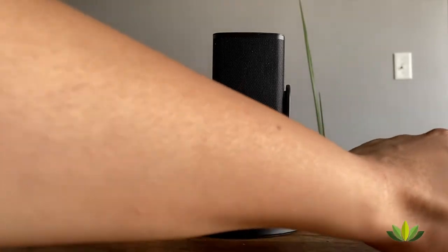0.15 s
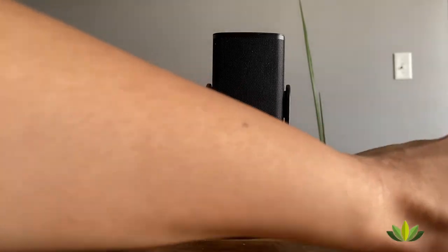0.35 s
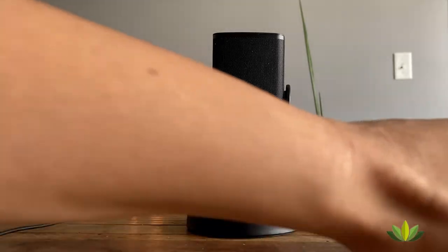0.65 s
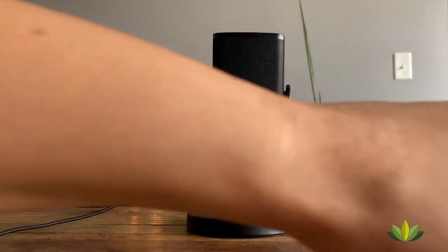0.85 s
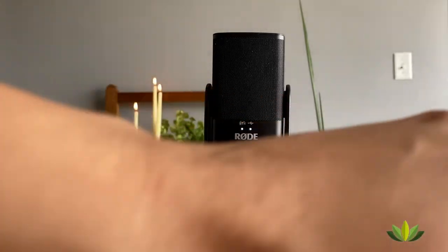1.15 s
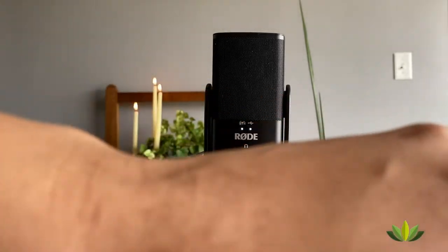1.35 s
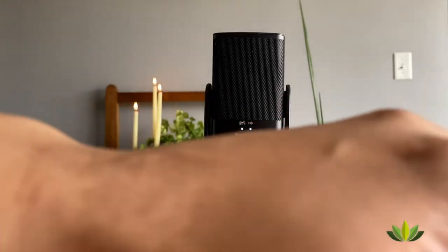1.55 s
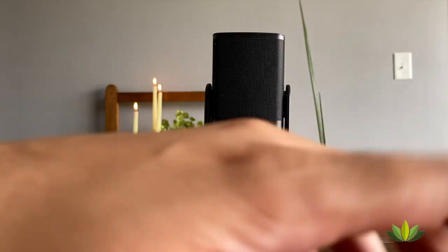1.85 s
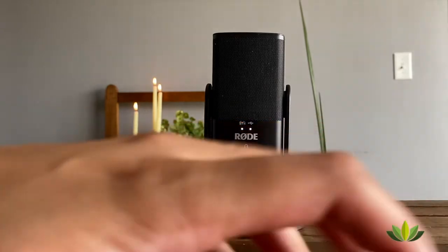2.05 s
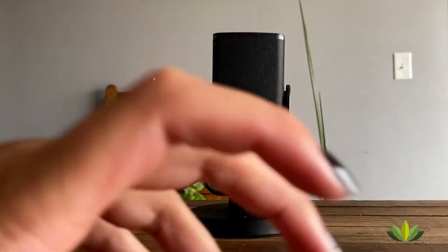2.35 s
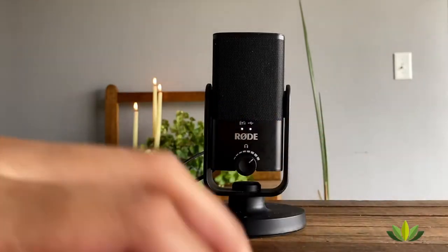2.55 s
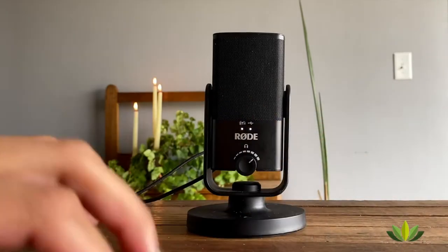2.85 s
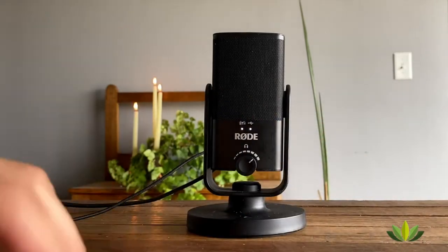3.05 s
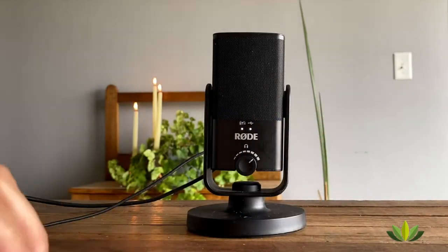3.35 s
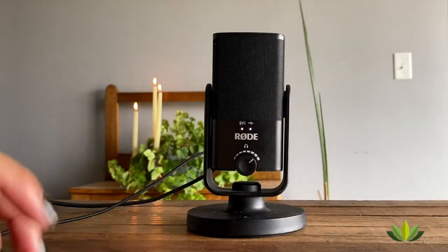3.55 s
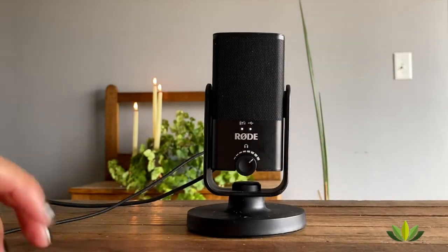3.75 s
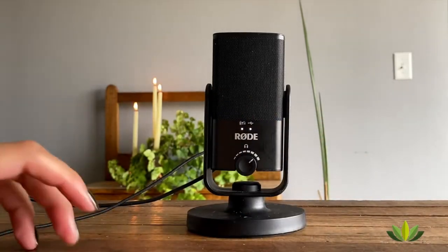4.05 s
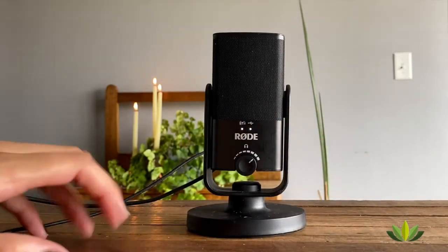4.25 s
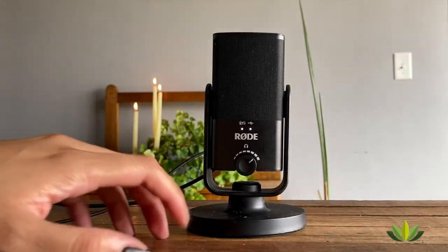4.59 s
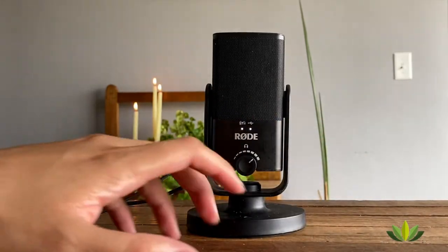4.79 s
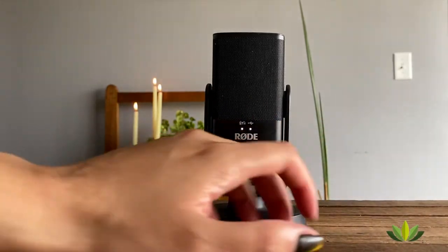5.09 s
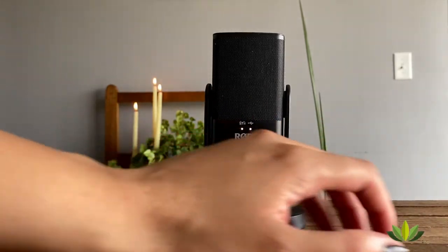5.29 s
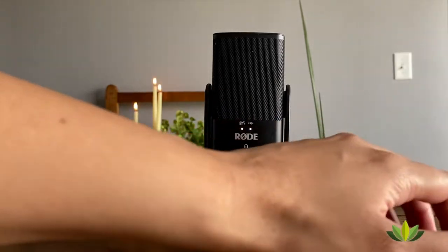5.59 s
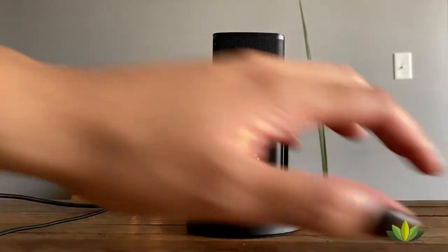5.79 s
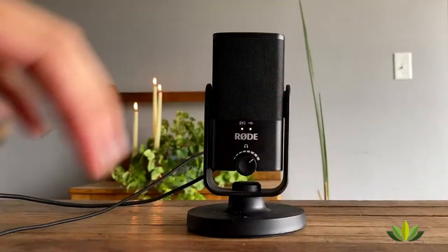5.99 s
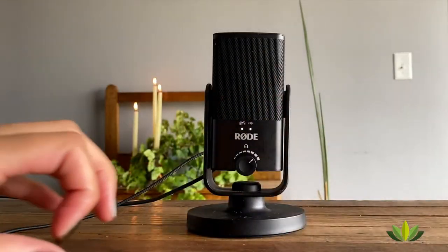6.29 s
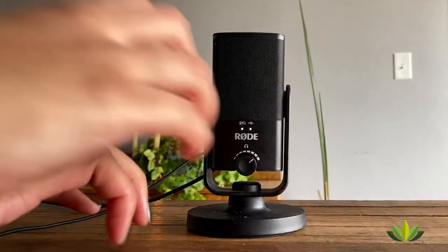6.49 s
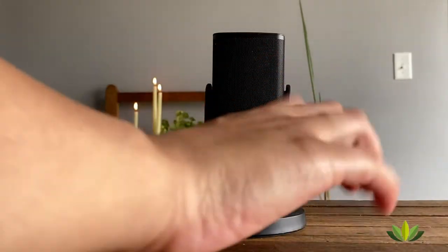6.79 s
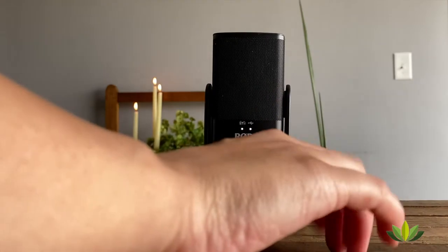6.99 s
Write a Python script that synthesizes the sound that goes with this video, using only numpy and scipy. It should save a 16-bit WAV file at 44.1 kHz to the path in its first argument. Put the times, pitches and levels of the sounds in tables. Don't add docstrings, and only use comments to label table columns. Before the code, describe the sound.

Close-up finger drumming on a hard wooden table, already under way at the start. Light and strong taps alternate unevenly, nails clicking, the board booming softly and the microphone stand shaking with low bumps. Skin drags faintly between hits. A near-silent pause holds dull rubbing and a light cloth swish, broken by one isolated nail tap, before the brisk tapping resumes with a short room echo.

```python
import sys
import numpy as np
from scipy import signal
from scipy.fft import rfft, irfft, next_fast_len
from scipy.io import wavfile
from scipy.ndimage import uniform_filter1d

SR = 44100
rng = np.random.default_rng(int(sys.argv[2]) if len(sys.argv) > 2 else 0)


def store_wav(level_fs):
    pcm = np.round(np.clip(np.atleast_2d(level_fs), -1, 1) * 32767)
    wavfile.write(sys.argv[1], SR, pcm.T.astype(np.int16))


def undo_db(level):
    steps = np.asarray(level, float) / 20
    return 10 ** steps


N = 314433


def unit(x):
    return x / np.sqrt(np.mean(x ** 2) + 1e-20)


def along(points, hz):
    f, v = np.transpose(points)
    return np.interp(np.log(hz + 1), np.log(f + 1), v)


def filtered(x, response):
    m = next_fast_len(N + 8192)
    return irfft(rfft(x, m) * response(np.fft.rfftfreq(m, 1 / SR)), m)[..., :N]


def hiss(spectrum):
    return unit(filtered(rng.standard_normal(N), lambda hz: undo_db(along(spectrum, hz)) * (hz > 20)))


def strokes(rows, round_off=0.59):
    t = np.arange(N) / SR
    gain = np.zeros(N)
    for start_s, length_s, level_db in rows:
        arch = np.abs(np.sin(np.pi * np.clip((t - start_s) / length_s, 0, 1))) ** round_off
        gain += undo_db(level_db) * arch * (t > start_s) * (t < start_s + length_s)
    return gain


def ring(modes, t, scatter_db, detune, lag=0):
    hz, db, t60 = np.transpose(modes)[:, :, None]
    strength, pitch, phase = rng.standard_normal((3, len(modes), 1))
    rest = len(t)
    t = t[:int(2 * t60.max() * SR) + 64]
    size = undo_db(db + scatter_db * strength - 60 * t / t60)
    x = np.sum(size * np.sin(2 * np.pi * hz * (1 + detune * pitch) * t + lag * phase), 0)
    return np.pad(x, (0, rest - len(t))) / np.abs(x).max()


def own(rows, s, usual):
    row = min(rows, key=lambda r: abs(r[0] - s))
    return row[1:] if abs(row[0] - s) < .0035 else usual


# knock_db, thud_db, nail_db, clack_db
LEAD_IN = [-21, -13, -28, -38]
LEAD_IN_S, LEAD_IN_HZ = -.021, 960
# start_s, knock_peak_db, board_thud_db,
# nail_click_db
FINGERTIP_TAPS = [(0.139, -52, -10, -15), (0.226, -36.5, -3.5, -8.5), (0.267, -25, -11.5, -11.5),
                  (0.443, -34, -1.5, -8.5), (0.447, -36.5, -6, -9), (0.584, -49, 1, -8),
                  (0.599, -28.5, -5.5, -15.5), (0.73, -34, -22, -11.5), (0.821, -40.5, 5, -5.5),
                  (0.839, -33.5, 0, -8), (0.985, -46.5, 2, 0), (1.021, -40.5, 4.5, -4.5),
                  (1.072, -36.5, 3.5, -5.5), (1.105, -40, 8.5, -13), (1.275, -48, 8.5, 2.5),
                  (1.298, -49, 15.5, -3.5), (1.344, -44.5, 13.5, 1), (1.387, -41.5, 8.5, -5.5),
                  (1.542, -52, 10, 5), (1.56, -45.5, 9.5, 2), (1.639, -49.5, 12, 0.5), (1.683, -33.5, 3.5, -5),
                  (1.837, -40, -2, -11.5), (1.888, -50.5, 9.5, -6), (1.925, -39.5, 4, -12.5),
                  (2.17, -53, -22, -9), (2.224, -36, 7, -3.5), (2.253, -24, -5.5, -10),
                  (2.388, -40.5, -14, -0.5), (2.535, -37, 4, -3.5), (2.573, -26.5, -3.5, -6.5),
              (2.712, -34, -5, -6), (2.726, -30.5, -11.5, -6.5), (2.812, -36.5, 2, -7),
              (2.859, -25, -6, -8.5), (3.001, -44, 10.5, 5), (3.074, -40, 4, -8),
              (3.127, -23.5, -9.5, -14.5), (3.384, -33.5, 1, -9), (3.41, -23.5, -4.5, -12.5),
              (3.523, -42.5, 10, 1.5), (3.536, -39.5, -2, -1), (3.617, -38.5, 3.5, -3),
              (3.653, -27.5, -2, -12), (3.777, -41.5, -3, -2), (3.793, -32.5, -0.5, -7),
              (3.87, -40, 2, -11), (3.934, -29, -9.5, -9),
                  (4.046, -38.5, -2.5, -7.5), (4.181, -29, -13.5, -10), (4.3, -34, -7, -17),
              (4.319, -31.5, -5, -12.5), (4.38, -44, 10, -9.5), (4.545, -35, -19, -15.5),
              (4.555, -26.5, -9.5, -12.5), (4.628, -38.5, 2.5, -6.5), (4.681, -31, -6.5, -6),
              (4.686, -46, 7, 4), (4.698, -56.5, 18, 11.5), (4.789, -22.5, -4, -7), (4.945, -34, -14, -10),
              (4.993, -44.5, -16, -9.5), (5.007, -35, -5, -15), (5.126, -38.5, -7, -16),
              (5.324, -28.5, -4.5, -8), (5.33, -28, -6, -7.5),
                  (5.882, -66, -4, -15), (5.912, -54, 0, -30), (5.925, -54.5, -6, -25), (6.132, -58.5, 1, -24),
           (6.695, -22, -2.5, -9), (6.712, -32.5, -4, -4.5), (6.925, -29.5, -3, -10.5),
           (7.01, -32, -10, -13), (7.041, -29.5, -4, -10.5), (7.051, -35, -15, -5)]
# start_s, knock_peak_db, board_thud_db, nail_click_db, hard_clack_db
NAIL_FIRST = [(0.148, -31, -8.5, -14, -11), (0.152, -29.5, -13.5, -13, -25), (0.722, -32, -4, -7, -21),
              (1.826, -38, 0, -7.5, 10), (2.096, -31, -10.5, -10.5, -22), (2.434, -45, -1.5, -8, 11),
              (2.995, -24, -15, -15.5, -8), (3.252, -32, -3.5, -4, 11), (3.265, -24.5, -6.5, -12.5, -1),
              (4.415, -35, -2, -3.5, -2), (4.842, -21, -10, -9, -38), (5.174, -30.5, -15, -7.5, 9),
              (5.868, -75, -6, -4, -3), (6.202, -26, -15, -25, 15), (6.467, -71, -9, 9, -6),
              (6.669, -39.5, -9, -11, 14.5), (6.747, -41, -14, -18, -4), (6.785, -36, -19, -16, -8),
              (6.809, -24.5, -13, -7.5, -9), (6.838, -25, -15, -25, -17), (6.977, -29.5, -15, -20, 4)]
# start_s, knock_peak_db, board_thud_db, nail_click_db, clack_db
GRAZES = [(1.588, -49, 3, 5, 27), (4.066, -45, 1, -15, 6), (5.199, -37, -1, -3, -8),
          (6.03, -64.5, 2, -20, -9), (6.186, -64, 3, -20, -9), (6.25, -71, 8, -20, -9),
          (6.690, -48, -20, -22, -4), (6.708, -34, -5, -20, -2), (6.790, -40, -5, -22, 9),
          (6.942, -42, -11, -6, 8), (6.947, -42.5, 4.5, -10, 3), (7.128, -41.5, 7, -5, 6)]
# time_s, knock_pitch_hz, clack_over_nail_db, grille_share_db, stand_over_thud_db
HAND = [(0, 730, 24, 11.5, -17), (.6, 840, 5.5, -34, -13.5), (1.0, 790, 12.5, -31, -17),
        (1.6, 796, 16, -39, -10.5), (1.7, 666, 20.5, 6, -15), (2.25, 630, 21.5, -25, -13),
        (2.5, 836, 10.5, -11, -12), (3.1, 900, 14, -28, -11.5), (3.749, 860, 15, -25, -19),
        (4.151, 960, 17, 11.5, -8), (4.451, 920, 22, 5, -20.5), (4.7, 900, 9.5, 5.5, -11),
        (4.85, 900, 17.5, 0.5, -15.5), (5.3, 850, 11.5, 2, -17.5), (6.2, 980, 25, -21, -11.5),
        (6.7, 870, 16.5, 0, -17.5), (7.1, 960, 20, 0.5, -19)]
# time_s, extra_shake_db
JOLTS = [
    (2.253, 4.5),
    (4.687, 19.5),
    (1.683, 1.5),
    (3.127, 2),
]
NAIL_FIRST_HZ, GRAZE_HZ = 1410, 1180
STIFFEN = 0.004


def contacts():
    when, *hand = np.transpose(HAND)
    rows = []
    for s, db, thud, nail in FINGERTIP_TAPS:
        hz, clack_over_nail = [np.interp(s, when, column) for column in hand[:2]]
        rows.append((s, db, thud, hz * (1 + STIFFEN * (db + 26.0)), nail + clack_over_nail, nail))
    for s, db, thud, nail, clack in NAIL_FIRST:
        rows.append((s, db, thud, NAIL_FIRST_HZ, clack, nail))
    for s, db, thud, nail, clack in [(LEAD_IN_S, *LEAD_IN)] + GRAZES:
        rows.append((s, db, thud, GRAZE_HZ if s > 0 else LEAD_IN_HZ, clack, nail))
    every = []
    for row in rows:
        s, db, thud = row[:3]
        grille_db, shake_db = [np.interp(s, when, column) for column in hand[2:]]
        jolt_db = sum(extra for at, extra in JOLTS if abs(s - at) < .0045)
        every.append((*row, grille_db, db + thud + shake_db + jolt_db))
    return every


# level_db, fade_60db_s
OWN = [(-5, .008), (-4, .005), (-6, .003)]


def spot_tone(t, part, hz):
    level_db, t60 = OWN[part]
    return undo_db(level_db - 60 * t / t60) * np.sin(2 * np.pi * hz * t)


REBOUND_S, REBOUND_DB = 0.004052, -15


def knock(t, knock_hz, nail_first, spot_hz, hard_db):
    spot = [(knock_hz, 0, .009), (knock_hz * 0.65, -5, .008),
            (knock_hz * 1.0, -3, .007), (knock_hz * 1.436, -4, .006)]
    wood = ring(spot, t, scatter_db=1.5, detune=.04, lag=.4)
    wood = 0.91 * (wood if nail_first else -wood) - undo_db(.5 * hard_db) * spot_tone(t, 0, spot_hz)
    return wood + undo_db(REBOUND_DB) * np.roll(wood, round(REBOUND_S * SR))


# pitch_hz, level_db, fade_60db_s
CLACK = [(1780, -8, 0.045), (1990, -1.5, 0.018), (2440, -7, 0.011), (2430, -7, 0.0058), (2835, 6.5, 0.011),
         (3400, 11.5, 0.0021)]


def clack(t, spot_hz, hard_db):
    wood = ring(CLACK, t, scatter_db=1.5, detune=.03, lag=.8)
    return undo_db(hard_db) * (0.57 * wood + spot_tone(t, 1, spot_hz))


# pitch_hz, level_db, fade_60db_s
NAIL = [(3820, -5.5, 0.0044), (4840, -13, 0.012), (6200, -7, 0.0053), (11000, 3, 0.0006),
        (12650, -2, 0.0019)]


def nail_click(t, spot_hz):
    noise = uniform_filter1d(np.diff(rng.standard_normal(len(t) + 1)), size=3)
    crack = undo_db(-60 * t / .0045) * noise
    nail = ring(NAIL, t, scatter_db=2, detune=.06, lag=2)
    return 1.08 * nail + spot_tone(t, 2, spot_hz) + 0.96 * crack / np.abs(crack).max()


# pitch_hz, level_db, fade_60db_s
BOARD = [(126.84, -11.5, 0.44), (167, -1.5, 0.15), (225, 0.5, 0.058), (291.9, -2, 0.2), (348.7, 1, 0.096),
         (417.7, 8.5, 0.044), (536, -0.5, 0.024), (618.5, 4, 0.044), (735, 2, 0.03), (772, -51, 0.074),
         (900, -33, 0.12), (293, 7, 0.018), (527, 11, 0.02)]
# time_s, drive_near_300hz_db, pad_push_db, board_build_up_s
BELLY = [(0, 2.5, 8, 0.00034), (.9, 6.5, -6, 0.00018), (1.5, 3.5, -14, 0.00011), (2.3, 0, -8, 0.00043),
         (2.7, -4, 1, 0.00036), (3.5, 2.5, -8, 0.0049), (3.8, 5.5, -16, 0.0021), (4.5, 3, -10.5, 0.0032),
         (4.9, -2, 6, 0.001), (5.4, 5, -12, 0.0018), (6.2, -5, 9, 0.0022), (6.8, 5.5, -8.5, 0.00036)]


def thud(t, s, nail_first, low_db, high_db):
    when, *columns = np.transpose(BELLY)
    belly_db, push_db, build_s = [np.interp(s, when, column) for column in columns]
    board = []
    for hz, level_db, t60 in BOARD:
        drive_db = (270 < hz < 335) * (belly_db + low_db) + (450 < hz < 680) * high_db
        board.append((hz, level_db + drive_db, t60))
    boom = (1 - np.exp(-t / build_s)) * ring(board, t, scatter_db=2.5, detune=.012, lag=.9)
    push = -np.sin(np.pi * np.clip(t / 0.001, 0, 1)) ** 2
    return .3 * (not nail_first) * undo_db(push_db) * push - boom


# pitch_hz, level_db, fade_60db_s
GRILLE = [(8800, 0, .004), (9500, -3, .003)]


def grille(t):
    return ring(GRILLE, t, scatter_db=3, detune=.02)


# pitch_hz, level_db, fade_60db_s
STAND = [(51.15, 8.5, 0.58), (77.36, 13, 0.38)]


def stand(t):
    return ring(STAND, t, scatter_db=4, detune=.012) * (1 - np.exp(-t / 0.051))


# pitch_hz, fade_60db_s
WALLS = [(100, 0.4), (400, 0.59), (1200, 0.55), (3000, 0.36), (8000, 0.2), (15000, 0.068)]
# delay_s, level_db against the whole tail
ECHOES = [(.0085, -3.5), (0.01, -12.5), (0.014, -13), (0.0183, -10.5)]
# pitch_hz, level_db
WET = [(100, -11), (500, -9.5), (2000, -16), (6000, -14), (15000, -9.5)]


def tail(size):
    hz, t, z = signal.stft(rng.standard_normal(size), SR, nperseg=256)
    x = signal.istft(z * undo_db(-60 * t / along(WALLS, hz)[:, None]), SR, nperseg=256)[1][:size]
    x = x * np.interp(np.arange(size) / SR, [.001, .003, .007, .009], [.1, .4, .3, 1])
    x = x / np.linalg.norm(x)
    for s, db in ECHOES:
        x[round(s * SR)] += undo_db(db + rng.normal(0, 0.85))
    hz = np.fft.rfftfreq(size, 1 / SR)
    return irfft(rfft(x / np.linalg.norm(x)) * undo_db(along(WET, hz)), size)


# time_s, knock_hz, clack_hz, nail_hz
TAP_PITCHES = [(0.147, 1300, 2700, 10100), (0.152, 1080, 3340, 9200), (0.226, 1120, 2130, 8850),
               (0.267, 1280, 2360, 6480), (0.442, 830, 2300, 6600), (0.447, 1040, 1820, 4400),
               (0.599, 1440, 2610, 4500), (0.723, 1570, 3420, 3940), (0.731, 1550, 2200, 4500),
               (0.821, 730, 3200, 4550), (0.839, 1390, 2170, 4600), (0.985, 706, 2200, 7540),
               (1.072, 720, 2430, 4930), (1.105, 1610, 2380, 5860), (1.298, 1090, 2550, 4700),
               (1.344, 1060, 2360, 4300), (1.542, 1090, 2200, 6800), (1.56, 1730, 2560, 4800),
               (1.639, 1710, 2500, 4640), (1.683, 1220, 2450, 6700), (1.826, 973, 1810, 5290),
               (1.837, 1460, 1880, 12490), (1.887, 1600, 2590, 4460), (1.925, 1140, 2500, 6300),
               (2.097, 1570, 1780, 12260), (2.224, 1248, 2410, 5850), (2.253, 1156, 2420, 6300),
               (2.535, 950, 2500, 5350), (2.573, 1150, 2260, 8300), (2.713, 1410, 2140, 12200),
               (2.726, 1350, 1740, 4800), (2.859, 1350, 1880, 9910), (2.995, 1420, 2400, 9300),
              (3.127, 1370, 1760, 9540), (3.252, 1310, 2460, 12100), (3.266, 1350, 3150, 6400),
              (3.41, 960, 2770, 6000), (3.535, 900, 3320, 4240), (3.618, 1150, 3120, 4400),
              (3.652, 1260, 2440, 5370), (3.778, 1480, 1990, 8400), (3.793, 1350, 2020, 9000),
              (3.934, 1300, 1920, 9200), (4.046, 970, 2000, 9400), (4.181, 1100, 2750, 9700),
              (4.319, 1440, 3150, 9600), (4.415, 940, 2530, 9100), (4.555, 1440, 2660, 8240),
              (4.628, 1570, 2640, 8290), (4.681, 1130, 2600, 8700), (4.789, 1507, 2260, 9600),
              (4.843, 1560, 2470, 8800), (4.945, 1560, 2500, 9600), (5.174, 1690, 3000, 9100),
              (5.33, 865, 2990, 8700), (6.202, 1297, 2300, 4900), (6.695, 1288, 2850, 6340),
              (6.81, 1240, 1840, 8790), (6.925, 872, 1960, 9900), (7.041, 1320, 2530, 10400)]
# time_s, clack_db, near_300hz_db, near_550hz_db
TAP_BALANCE = [(0.147, -11, 6.5, 2), (0.152, 0, 8, 4), (0.226, -2, 5, 2), (0.267, -10.5, 5, -4.0),
               (0.442, 2, -2, -4), (0.447, -4, -6, -9), (0.599, 2.5, 0, -17), (0.723, -10, 2, -5),
               (0.731, 4, 10, 9), (0.821, 6.5, 3, -16), (0.839, -3, 0, -0.5), (0.985, 9.5, 2, 2),
               (1.072, 0, -4.5, -0.5), (1.105, 0, -4.5, -1.5), (1.298, 7.5, -4, -8), (1.344, 3.5, -1, -5.0),
               (1.542, 10, -1, -4), (1.56, 1, -1.5, -9), (1.639, 4.5, 5, -1.5), (1.683, -3.5, -1, 3),
               (1.826, 4, 2, -6.5), (1.837, 5.0, -6, 1), (1.887, 3.0, 3, -6), (1.925, 11, -1.5, -1.0),
               (2.097, 0, -1, -4.5), (2.224, -3, -8, -1.5), (2.253, 3.5, -9, 4), (2.535, -2, -7, -1),
               (2.573, 0.5, -13, 3.5), (2.713, -3, 3, 1),
               (2.726, -1, 4, -13), (2.859, -5, 0, 5.0), (2.995, 5.5, 10, -7), (3.127, -10, 1.5, 7.5),
              (3.252, -2, -6, 11), (3.266, -2, 5, -2.5), (3.41, -6, -5, 7), (3.535, 2, -6, 13),
              (3.618, -9, 8, 8), (3.652, -8, 3, 10.5), (3.778, 4.5, 3, 13), (3.793, -4, 3, 5.5),
              (3.934, -11.5, -12, 14), (4.046, 0.5, -8, -1), (4.181, -7.5, -4, -5),
              (4.319, -2.5, -5.5, 4.5), (4.415, 12, 5, 10), (4.555, -10.5, 9, 8.5), (4.628, 1.5, 1.5, 1.0),
              (4.681, 0, 12, -9), (4.789, 5, -1.5, 1.5), (4.843, -2.0, 0.5, 4), (4.945, -9, -11, -6),
              (5.174, -3, 1.0, 4), (5.33, -0.5, 8.5, -1), (6.202, -2, 3, -1.5), (6.695, -6.5, -4, 0),
              (6.81, 0, 3.5, -0.5), (6.925, 1.5, -5, 4), (7.041, -14, 0.5, 4)]
SPREAD_S = .004


def taps():
    size = SR // 2
    out, t = np.zeros(N + 2 * size), np.arange(size) / SR
    onset = 1 - np.exp(-t / 0.00052)
    for s, db, thud_db, knock_hz, clack_db, nail_db, grille_db, shake_db in contacts():
        nail_first = knock_hz >= NAIL_FIRST_HZ
        hard_db, low_db, high_db = own(TAP_BALANCE, s, usual=(0, 0, 0))
        spot_knock, spot_clack, spot_nail = own(TAP_PITCHES, s, usual=(1350, 2450, 5000))
        contact = undo_db(8.5) * knock(t, knock_hz, nail_first, spot_knock, hard_db)
        contact += undo_db(clack_db - 3.5) * clack(t, spot_clack, hard_db)
        contact += undo_db(nail_db + 12.5) * nail_click(t, spot_nail)
        contact *= onset
        body = undo_db(thud_db + 8.5) * thud(t, s, nail_first, low_db, high_db)
        body += undo_db(nail_db + grille_db + 12.0) * grille(t)
        body *= onset
        blurred = contact * undo_db(-60 * t / SPREAD_S)
        blurred = blurred * np.linalg.norm(contact) / np.linalg.norm(blurred)
        far = undo_db(db) * (1.02 * blurred + body)
        hit = undo_db(db) * (contact + body)
        hit += signal.fftconvolve(far[:size // 2], tail(size))[:size]
        hit += undo_db(shake_db + 8.0) * stand(t)
        start = size + round((s + .0006) * SR)
        out[start:start + size] += hit * np.clip((.5 - t) / 0.1, 0, 1)
    return out[size:size + N]


# pitch_hz, level_db per Hz
AIR = [(18, -24), (35, 3.5), (60, -3), (400, -9.5), (700, -16), (2200, -24.5), (5000, -27), (16000, -28)]


def room_tone():
    return undo_db(-68) * hiss(AIR)


# start_s, length_s, level_db
SLIPS = [
    (0.14, 0.0019, -34),
    (0.143, 0.073, -62),
    (1.553, 0.096, -77),
    (1.836, 0.038, -77.5),
]
# pitch_hz, level_db per Hz
CLOTH = [(2000, -30), (5000, -10), (9000, -2), (13000, 0), (16500, -3)]


def nail_slips():
    return strokes(SLIPS) * hiss(CLOTH)


# start_s, length_s, level_db
DRAGS = [(.155, 0.15, -74), (.44, 0.091, -66), (.74, 0.054, -73), (1.55, 0.065, -71), (2.09, .11, -70),
         (5.199, 0.025, -54), (5.232, 0.029, -57), (5.255, 0.008, -69)]
# pitch_hz, level_db per Hz
SKIN = [(250, -45), (380, -4), (1060, 13), (2470, 0), (3760, -5), (12400, -9.5), (16000, -14)]
CATCHES_PER_S, CATCH_S, CATCH_DB = 240, 0.00041, 16


def drags():
    catch = (rng.random(N) < CATCHES_PER_S / SR) * rng.random(N)
    fade = np.exp(-np.arange(200) / SR / CATCH_S)
    grain = 1 + undo_db(CATCH_DB) * np.convolve(catch, fade)[:N]
    skin = undo_db(8.5) * unit(grain * hiss(SKIN)) * strokes(DRAGS)
    return skin + signal.fftconvolve(skin, tail(SR // 2))[:N]


# time_s, pitch_hz, tone_db, overtone_haze_db
DRONE = [(5.45, 146, -84, -82), (5.55, 143.2, -71, -73), (5.7, 145, -71, -78.5), (5.798, 145, -81, -66),
         (5.87, 147, -70, -81), (5.95, 144, -70, -62), (6.0, 140, -91, -79)]


def drone():
    table = np.asarray(DRONE, float)
    t = np.arange(N) / SR
    phase = 2 * np.pi * np.cumsum(np.interp(t, table[:, 0], table[:, 1])) / SR
    when = np.r_[table[0, 0] - .015, table[:, 0], table[-1, 0] + .015]
    tone, haze = [undo_db(np.interp(t, when, np.r_[-110, table[:, c], -110])) for c in (2, 3)]
    haze = haze * hiss([(300, -28), (400, -5), (470, 6), (560, -54)])
    return np.sqrt(2) * tone * np.sin(phase) + haze


# start_s, length_s, level_db
RUBS = [
    (5.86, 0.13, -72.5),
    (5.98, 0.17, -70.5),
    (6.19, 0.32, -73),
]
# pitch_hz, level_db per Hz
RUB = [(500, -30), (1000, 5), (2000, 6.5), (2900, 4), (4000, -9)]


def palm_rubs():
    return strokes(RUBS) * hiss(RUB)


# start_s, length_s, level_db, pitch_hz
SQUEAKS = [
    (5.872, 0.012, -71, 5950),
    (5.878, .016, -69, 2700),
    (5.88, 0.014, -66, 1940),
]


def squeaks():
    t = np.arange(N) / SR
    skin = np.zeros(N)
    for start_s, length_s, level_db, hz in SQUEAKS:
        skin += strokes([(start_s, length_s, level_db)]) * np.sin(2 * np.pi * hz * t)
    return skin + signal.fftconvolve(skin, tail(SR // 2))[:N]


# start_s, length_s, level_db
BRUSH = [
    (5.99, 0.22, -79),
    (6.3, 0.16, -67.5),
    (6.465, 0.037, -66.5),
]


def sleeve_brush():
    return strokes(BRUSH) * hiss(CLOTH)


def scene():
    hand = taps() + nail_slips() + drags() + palm_rubs() + squeaks() + sleeve_brush()
    return (hand + room_tone() + drone())[None]


def low_pass(x):
    return signal.sosfilt(signal.butter(12, 16830, fs=SR, output="sos"), x)


def record(dry):
    def mic(hz):
        bass = hz ** 4 / (hz ** 4 + 35.0 ** 4)
        return bass / (1 + (hz / 16000) ** 60)
    return low_pass(filtered(dry, mic))


dry = scene()
out = record(dry)
store_wav(out)
```